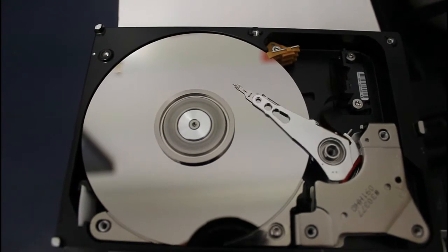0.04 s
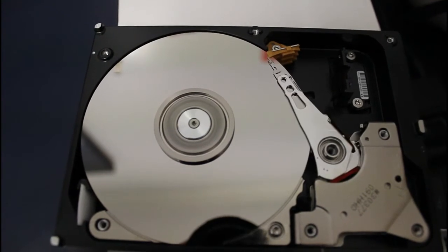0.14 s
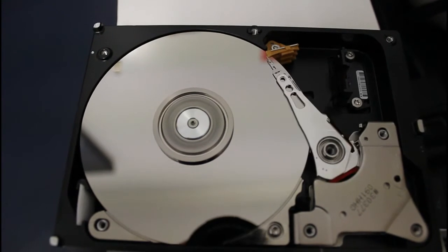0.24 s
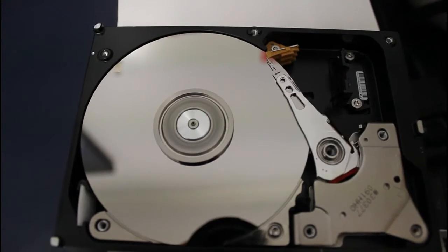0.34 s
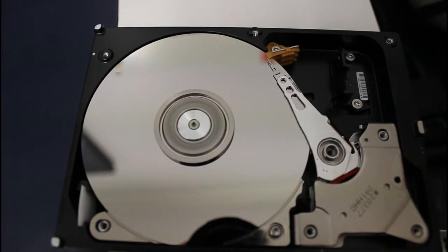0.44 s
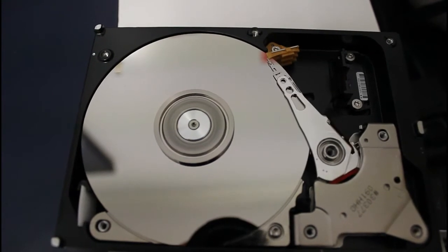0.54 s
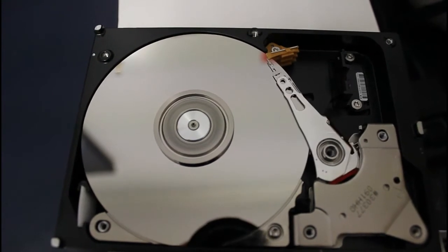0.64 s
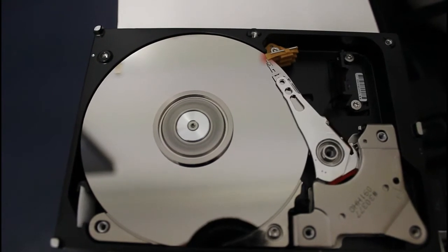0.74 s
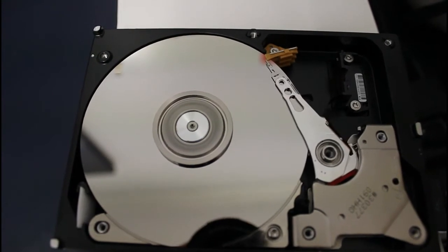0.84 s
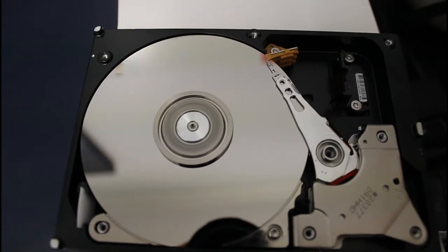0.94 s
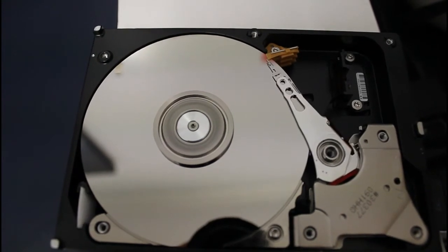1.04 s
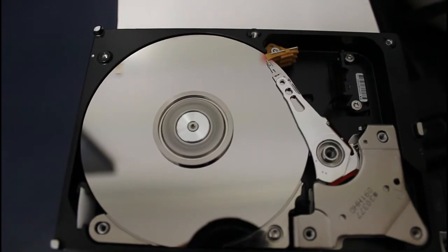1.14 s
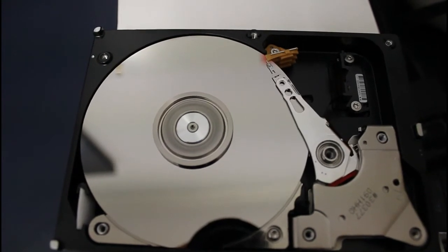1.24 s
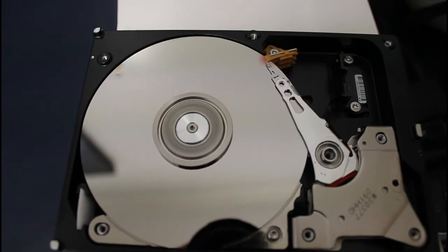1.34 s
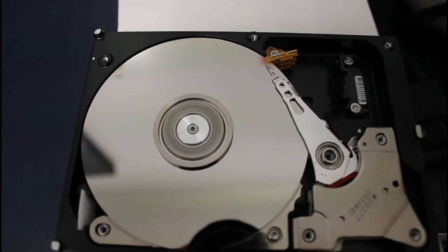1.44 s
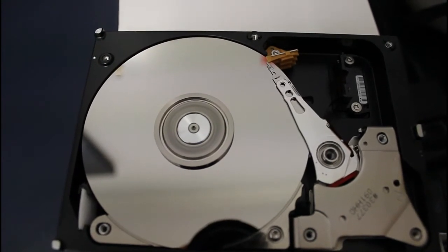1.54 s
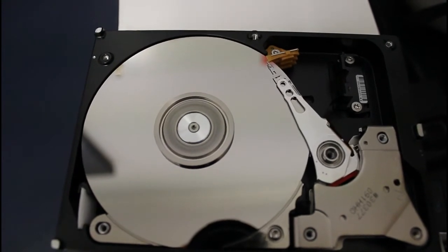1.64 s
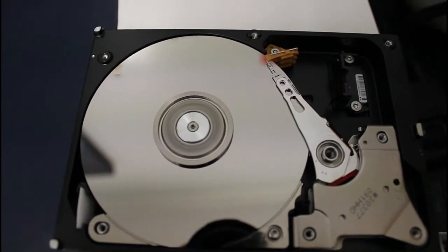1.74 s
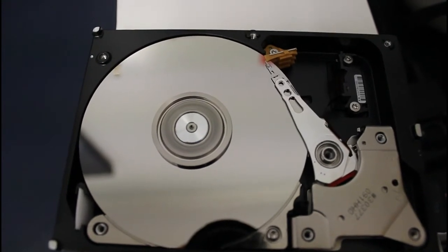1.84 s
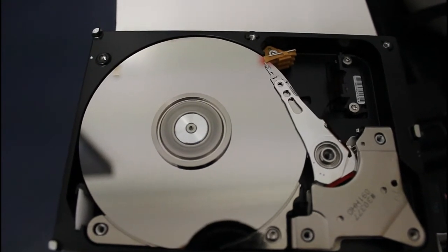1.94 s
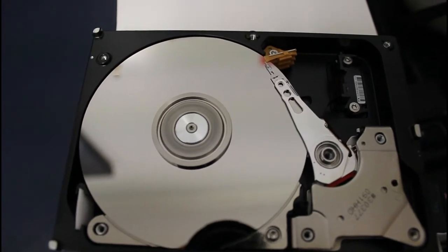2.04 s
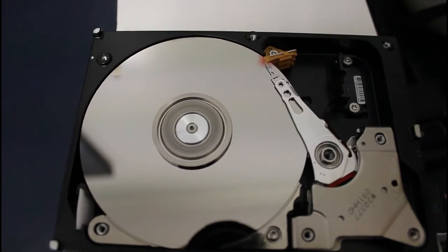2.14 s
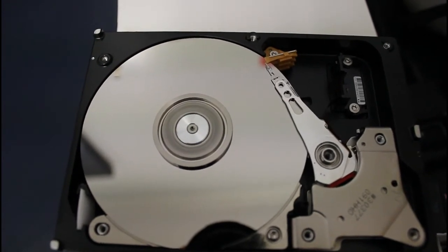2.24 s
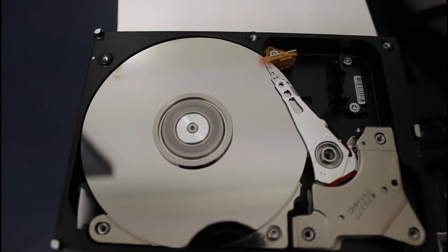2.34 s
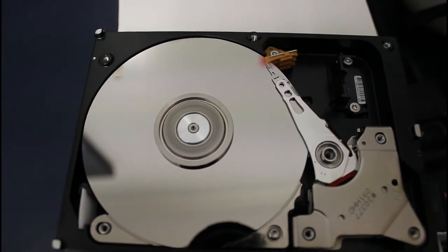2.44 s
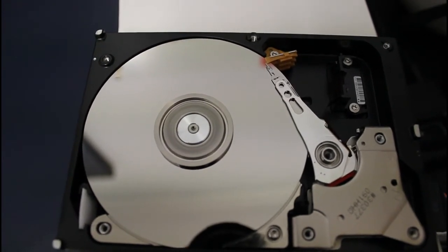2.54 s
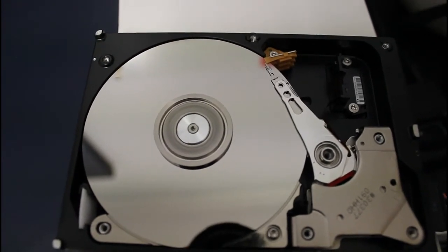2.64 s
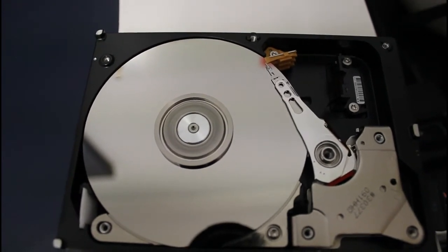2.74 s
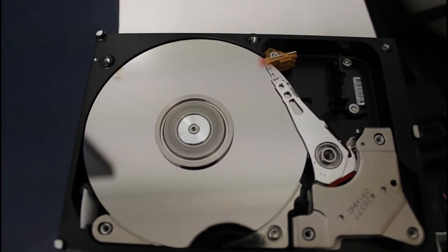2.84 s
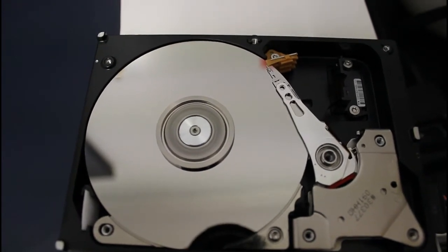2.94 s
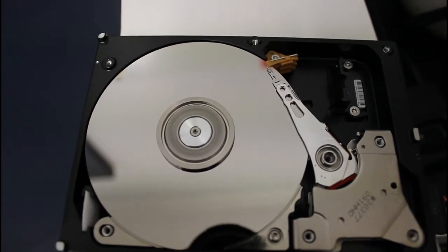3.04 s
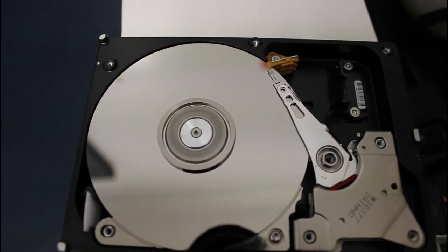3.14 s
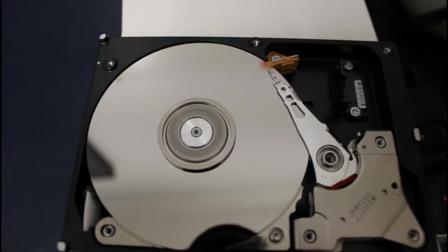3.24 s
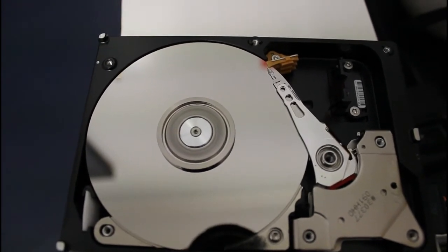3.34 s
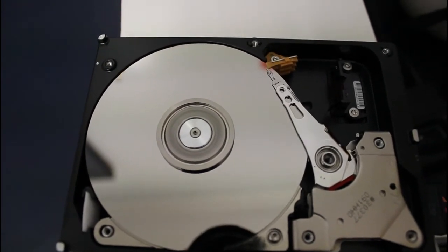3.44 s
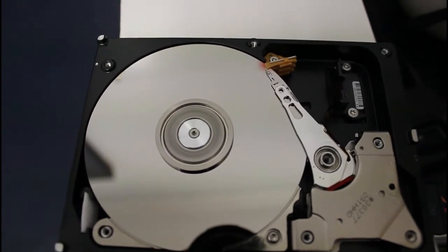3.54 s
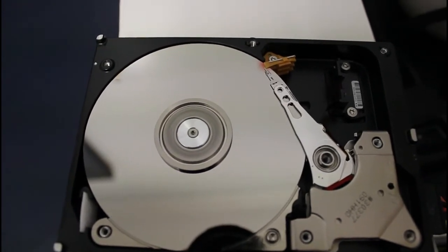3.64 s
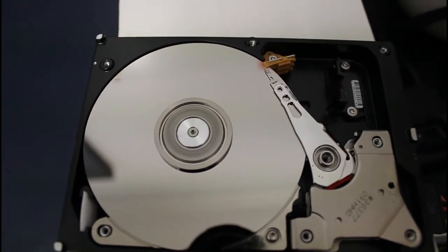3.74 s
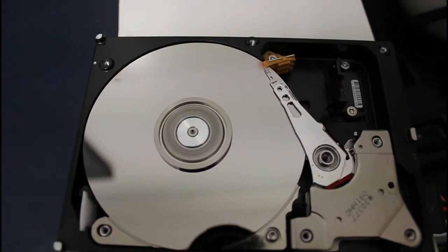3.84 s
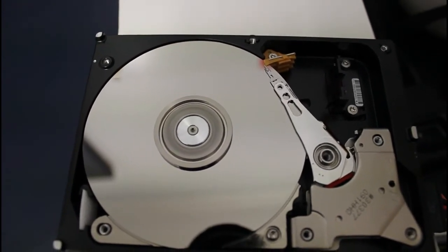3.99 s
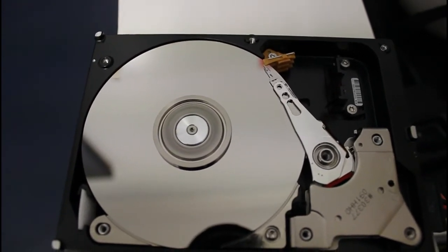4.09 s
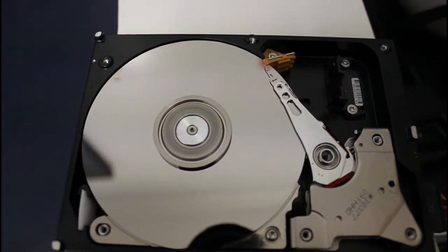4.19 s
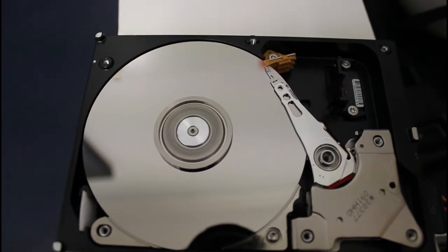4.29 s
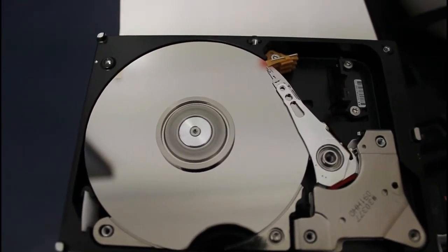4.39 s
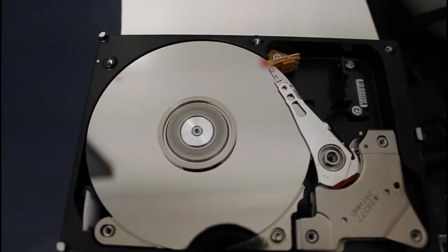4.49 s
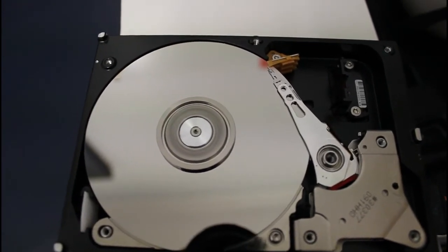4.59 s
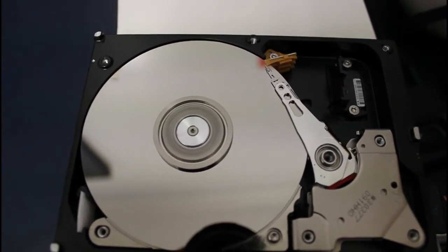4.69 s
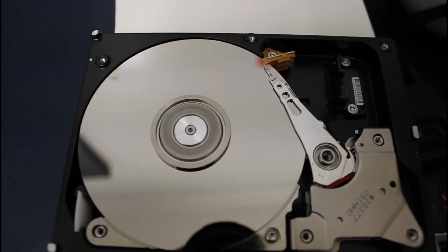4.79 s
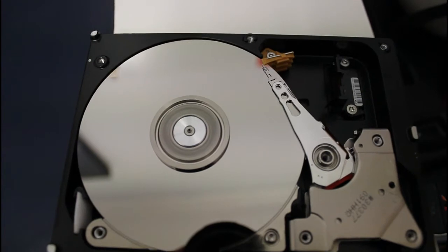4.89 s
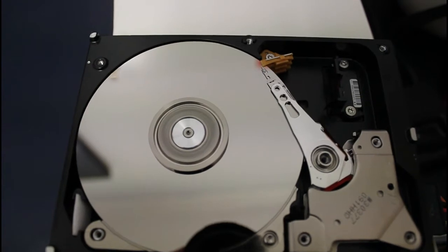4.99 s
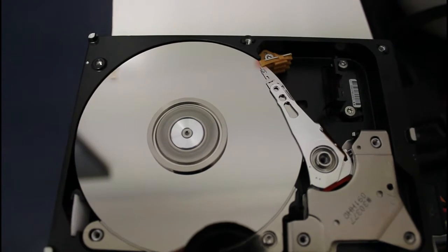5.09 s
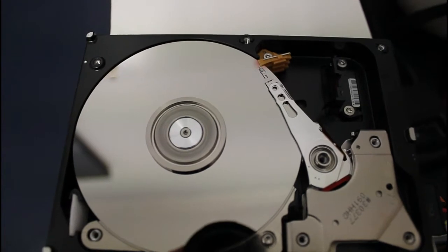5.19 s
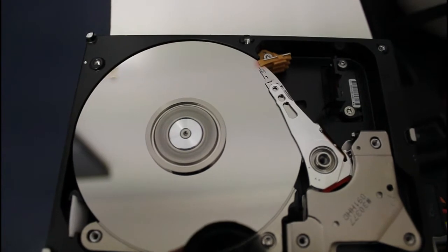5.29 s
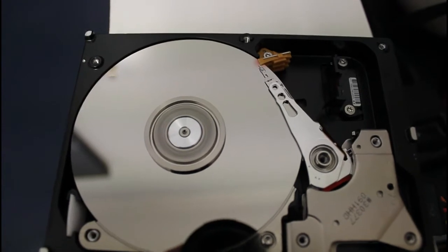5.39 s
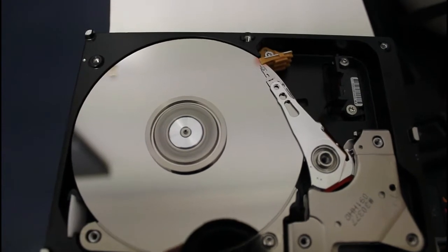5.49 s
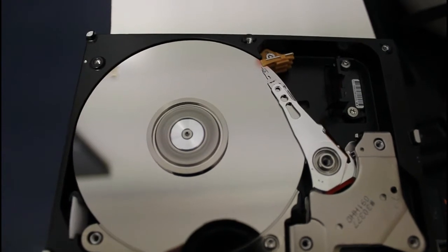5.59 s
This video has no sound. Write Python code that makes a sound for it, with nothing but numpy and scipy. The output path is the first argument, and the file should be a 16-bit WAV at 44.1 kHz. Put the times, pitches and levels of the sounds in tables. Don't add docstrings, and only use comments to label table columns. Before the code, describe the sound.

A sharp double clack of a drive arm at the start, then spinning-disk rush with a harsh, fluttering high whine that stops for two seconds and returns.

```python
import sys
import numpy as np
from scipy import signal
from scipy.fft import rfft, irfft, next_fast_len
from scipy.io import wavfile
from scipy.ndimage import uniform_filter1d

SR = 44100
rng = np.random.default_rng(int(sys.argv[2]) if len(sys.argv) > 2 else 0)


def invert_db(x):
    u = np.asarray(x, float) / 20
    return 10 ** u


def int16_out(signal):
    q = np.round(np.clip(np.atleast_2d(signal).T, -1, 1) * 32767)
    wavfile.write(sys.argv[1], SR, q.astype(np.int16))


N = 247842
T = np.arange(N) / SR
M = next_fast_len(N)
F = np.arange(M // 2 + 1) * SR / M


def unit(x):
    return x / np.sqrt(np.mean(x ** 2))


def white():
    return rng.standard_normal(len(F)) + 1j * rng.standard_normal(len(F))


def walk(db, rate):
    hold_ms = int(1000 / rate)
    ms = np.arange(1000 * N // SR + 2)
    levels = rng.standard_normal(len(ms) // hold_ms + 1)
    steps = np.repeat(levels, hold_ms)[:len(ms)]
    slewed = uniform_filter1d(uniform_filter1d(steps, hold_ms), hold_ms)
    return np.interp(T, ms / 1000, invert_db(db * unit(slewed)))


def bands(colour, flicker_db, rate):
    hz, db = np.transpose(colour)
    noise = white() * invert_db(np.interp(np.log(F + 1), np.log(hz), db))
    place = np.clip(2 * np.log2(F / 40 + 1e-9), 0, 18)
    out = 0
    for k in range(19):
        share = np.cos(np.pi / 2 * np.clip(place - k, -1, 1)) ** 2
        out = out + irfft(noise * share, M)[:N] * walk(flicker_db, rate)
    return unit(out)


def rung(modes, flicker_db, rate, steady=0.):
    out = 0
    for hz, width, db in modes:
        ring = white() / (1 + 1j * (F - hz) / (0.69 * width)) ** 2
        if steady > 0:
            x = np.fft.ifft(ring, M)[:N]
            x = x.real / np.abs(x) ** min(steady, 1)
        else:
            x = irfft(ring, M)[:N]
        out = out + unit(x) * invert_db(db) * walk(flicker_db, rate)
    return out


def gate(spans, edge_s, db=0):
    level = np.zeros(N)
    for (on, off), gain in zip(spans, invert_db(db + np.zeros(len(spans)))):
        level[int(on * SR):int(off * SR)] = gain
    return uniform_filter1d(level, int(edge_s * SR))


# frequency in Hz, density in dB per Hz.
AIR = [(25, -50), (45, -27), (70, -24), (100, -14.5), (200, -13.5), (370, -16), (600, -15), (1200, -9),
       (1830, -8.5), (2660, -1.5), (4280, -10.5), (6550, -13), (10000, -23.5), (15700, -35)]
# frequency in Hz, width in Hz, level in dB.
CAVITIES = [(1074, 29, -15), (1417, 194, 1), (2080, 167, 0), (2660, 206, 0), (3130, 50, -12),
            (3890, 290, -8), (4750, 160, -9), (5553, 320, -1.5), (6360, 810, -3)]
HUM_HZ = [83, 121, 220, 498, 3121, 9502, 11999]
# width in Hz, level in dB.
HUM_SHAPE = [(1.5, -18), (2, -13.5), (.8, -13.5), (3, -18), (8, -14), (3, -26), (3, -35)]


def platter():
    air = invert_db(9) * bands(AIR, 0.76, 7.5)
    cavities = rung(CAVITIES, 0.33, 12)
    hum = rung(np.column_stack([HUM_HZ, HUM_SHAPE]), 0.74, 3.8, steady=0.96)
    return air + cavities + hum


# start in seconds, peak in dB, tilt in dB per octave, share of full ring time.
KNOCKS = [(.0, -34, 0, 0.77), (.0025, -21, -5, 0.39), (0.0783, -24.5, -8, 0.52), (.083, -39, -3, 0.55),
          (0.0966, -17, 0, 0.3), (0.0975, -5.5, 0, 0.21), (0.0991, -18.5, 3, 0.75), (0.1023, -28, 3, 0.66),
          (0.108, -20.5, -4.5, 0.38), (.1108, -36, -7, 0.45), (0.117, -21, -3, 0.28),
          (.1198, -15, -1, 0.42), (.1225, -37, -4, 1), (.128, -30, -8, 1.2), (.1405, -28, -9, 0.76)]
RAMP_HZ = [736, 1293, 1648, 2020, 2452, 2700, 2981, 3676, 4854, 5604, 6305, 6735, 8237, 9500, 11200, 12852]
# level in dB, 60 dB decay time in seconds.
RAMP_RING = [(-17, 0.038), (-19, .03), (-9, 0.037), (-3.5, 0.032), (-1, .04), (-6, 0.033), (4, 0.028),
             (-6, 0.049), (-11, 0.039), (0, 0.03), (-8, 0.036), (-33, 0.018), (-27, .02), (-22, .02),
             (-33, .03), (-18, 0.022)]


def knocks():
    scatter_db = 1.5
    out, t = np.zeros(N), np.arange(SR // 8) / SR
    hz, mode_db, t60 = np.column_stack([RAMP_HZ, RAMP_RING]).T[:, :, None]
    scrape_band = signal.butter(4, [1500, 6800], "band", fs=SR, output="sos")
    for s, db, tilt_db, share in KNOCKS:
        g, jitter, phase = rng.standard_normal((len(RAMP_RING), 3)).T[:, :, None]
        size = invert_db(mode_db + scatter_db * g + tilt_db * np.log2(hz / 3000))
        decay = np.exp(-np.log(1000) * t / (t60 * share))
        tones = np.sin(2 * np.pi * hz * (1 + .006 * jitter) * t + .3 * phase)
        ring = np.sum(size * decay * tones, axis=0)
        noise = signal.sosfilt(scrape_band, rng.standard_normal(len(t)))
        tail = invert_db(-23.0) * noise * np.exp(-t / (0.002 * share))
        crack = invert_db(-38.5 + tilt_db) * np.diff(rng.standard_normal(len(t) + 1)) * np.exp(-t / 0.0024)
        hit = (ring / np.abs(ring).max() + tail + crack) * (1 - np.exp(-t / 0.0004))
        i = int(s * SR)
        out[i:i + len(t)] += invert_db(db) * hit / np.abs(hit).max()
    return signal.sosfilt(signal.butter(2, 1300, "high", fs=SR, output="sos"), out)


# centre in seconds, level in dB, frequency in Hz, length in seconds.
THUDS = [(.01, -49, 267, .03), (0.11, -51, 286, 0.06), (0.112, -55.5, 183, 0.12), (1.678, -48, 195, 0.074),
         (1.94, -50, 305, 0.25), (2.547, -47, 288, 0.056), (2.938, -47, 275, 0.026),
         (3.923, -49.5, 307, 0.073), (4.11, -49.5, 272, 0.09), (4.503, -52, 310, 0.091),
         (4.95, -52.5, 179.6, 0.17)]


def thuds():
    wobble = np.cumsum(walk(.35, 60)) / SR
    out = np.zeros(N)
    for s, db, hz, length in THUDS:
        swell = np.exp(-2 * ((T - s) / length) ** 2)
        out += invert_db(db) * np.sin(2 * np.pi * hz * wobble) * swell
    return out


# on in seconds, off in seconds.
DRIVEN = [
    (.013, .079),
    (.137, .394),
    (.398, 1.318),
    (3.318, 3.921),
    (3.938, 5.7),
]
COIL_DB = [-3, -1.5, -0.5, 0.05, 0.1]
# frequency in Hz, width in Hz, level in dB.
BROAD_MODES = [(2222, 320, 4.5), (2430, 255, 2), (5025, 120, -2.5), (5595, 280, 2), (10200, 310, -18),
               (13080, 140, -24), (14600, 500, -22)]
SHARP_HZ = [1830, 2299, 2750, 3435, 3985, 4420, 4800, 6237, 7150, 12500, 14085]
# width in Hz, level in dB.
SHARP_SHAPE = [(40, -11), (30, -0.5), (60, 0), (90, -5.5), (80, -8.5), (80, -13), (60, -10), (40, -5),
               (8, -8.5), (60, -18), (140, -20)]
# frequency in Hz, density in dB per Hz.
COIL_HISS = [(1000, -41), (3000, 4), (4500, 2), (7000, -20), (10000, -15), (13000, -6), (15700, -17)]


def arm():
    rough = walk(0.37, 60) * walk(0.18, 16)
    broad = rung(BROAD_MODES, 0.2, 18)
    sharp = rung(np.column_stack([SHARP_HZ, SHARP_SHAPE]), 0.63, 14, steady=0.18)
    hiss = invert_db(-0.5) * bands(COIL_HISS, 0.67, 10)
    return rough * (broad + sharp + hiss) * gate(DRIVEN, 0.0045, db=np.array(COIL_DB))


# low mode in dB, middle mode in dB, top mode in dB.
SINGING = [(-7, -6, -15), (-10, -12, -11.5), (-8.5, -13.5, -11.5), (-7, -17, -9), (-6.5, -14, -12)]
SING_DRIFT_DB_S = [1.3, 0.1, -2.2]
# centre in seconds, length in seconds, dB toward the low mode.
SWINGS = [(0.367, 0.02, 8.9), (0.469, 0.04, 12.8), (0.663, 0.043, 12.2), (0.763, 0.06, 11.5),
          (0.848, 0.02, 10.8), (0.925, 0.034, 11), (1.007, 0.032, 11.4), (1.08, 0.027, 2), (1.147, 0.02, 6),
          (1.207, 0.08, -11), (3.333, 0.024, 14), (3.387, 0.02, -11.7), (3.437, 0.04, 13),
          (3.532, 0.052, 11.6), (3.704, 0.08, 13.2), (3.859, 0.02, -8.5), (3.9, 0.03, 13),
          (3.973, 0.06, -7.8), (4.056, 0.04, 10), (4.168, 0.1, -3), (4.32, 0.03, 8.8), (4.42, 0.11, -6.0),
          (4.49, 0.03, 11.0), (4.849, 0.03, -9.1), (4.926, 0.071, 5), (5.006, 0.033, 5), (5.078, 0.11, 6.6),
          (5.19, 0.04, 9.2), (5.313, 0.071, 9), (5.475, 0.06, -6.8)]
SWING_SHARE = [.55, -.2, -1.0]
SING_WANDER_DB = [0.5, 1.1, -0.2]
SING_CEILING_DB = [5.5, 2, -0.5]


def singing():
    coarse = T[::44]
    swells = sum(db * np.exp(-4 * ((coarse - s) / length) ** 2) for s, length, db in SWINGS)
    swing = np.interp(T, coarse, swells)
    starts = np.array(DRIVEN)[:, 0]
    held = T - starts[np.maximum(np.searchsorted(starts, T) - 1, 0)]
    levels = []
    for db, share, top_db, drift_db, wander_db in zip(
            np.transpose(SINGING), SWING_SHARE, SING_CEILING_DB, SING_DRIFT_DB_S, SING_WANDER_DB):
        motion = invert_db(np.minimum(share * swing, top_db) + drift_db * held)
        levels.append(gate(DRIVEN, 0.0023, db=db) * motion * walk(wander_db, 25))
    return levels


# frequency in Hz, width in Hz, level in dB.
SING_MODES = [
    [(9330, 210, -2), (9482, 45, -2.5)],
    [(11554, 15, 1), (11610, 70, -9)],
    [(12468, 12, 3)],
]
FOLLOWER_HZ = [10643, 11980, 15211]
# width in Hz, level in dB.
FOLLOWER_SHAPE = [(50, -6), (130, -2), (26, -10)]


def suspension():
    steadiness = (.15, .7, .9)
    levels = singing()
    tones = 0
    for modes, level, steady in zip(SING_MODES, levels, steadiness):
        tones = tones + level * rung(modes, 1.8, 60, steady=steady)
    followers = rung(np.column_stack([FOLLOWER_HZ, FOLLOWER_SHAPE]), 1.5, 30, steady=.2)
    return tones + np.abs(levels[2]) ** 0.62 * followers * invert_db(-3.5)


# on in seconds, off in seconds, frequency in Hz, width in Hz, level in dB.
SEEKS = [
    (0.014, .079, 4880, 120, -45),
    (3.237, 3.316, 2380, 250, -39),
]


def seeks():
    out = 0
    for on, off, *mode in SEEKS:
        out = out + rung([mode], 2.3, 80, steady=0.54) * gate([(on, off)], .004)
    return out


# start in seconds, dB above the ducked level, decay in seconds.
RATTLES = [
    (0, 9.5, 0.026),
    (0.097, 11, 0.02),
]


def gain_control():
    full_db, duck_db, recover_s = -39.5, 14.5, .52
    slam_s, slam_duck_db, slam_recover_s = 0.14, -0.5, 0.22

    def fade(s, decay):
        return np.exp(-np.abs(T - s) / decay) * (T >= s)

    rattle = sum(db * fade(s, decay) for s, db, decay in RATTLES)
    ducked = duck_db * fade(0, recover_s) + slam_duck_db * fade(slam_s, slam_recover_s)
    return invert_db(full_db - ducked + rattle)


def scene():
    steady = invert_db(-3.5) * platter() + invert_db(-3.0) * arm() + suspension()
    mono = steady * gain_control() + seeks() + knocks() + thuds()
    return np.array([mono, mono])


def roll_off(x):
    return signal.sosfilt(signal.butter(12, 16360, fs=SR, output="sos"), x)


def record(dry):
    cut = irfft(rfft(dry, M) * (F < 15770), M)[:, :N]
    return roll_off(cut)


dry = scene()
out = record(dry)
int16_out(out)
```